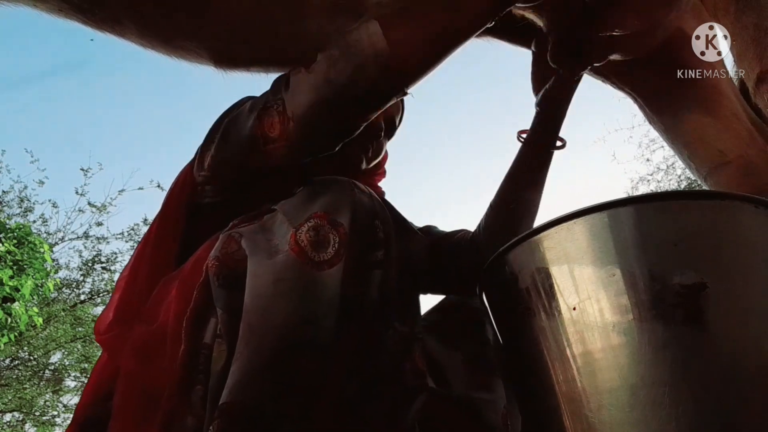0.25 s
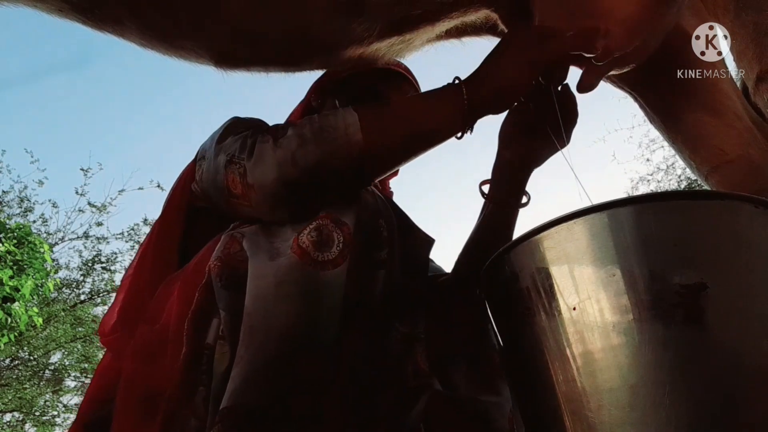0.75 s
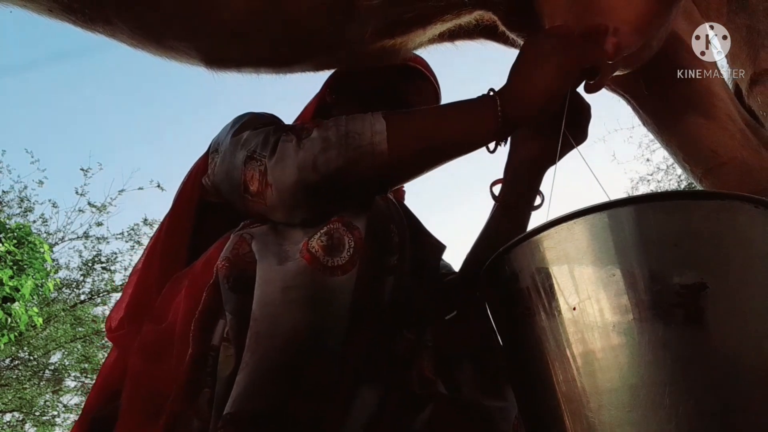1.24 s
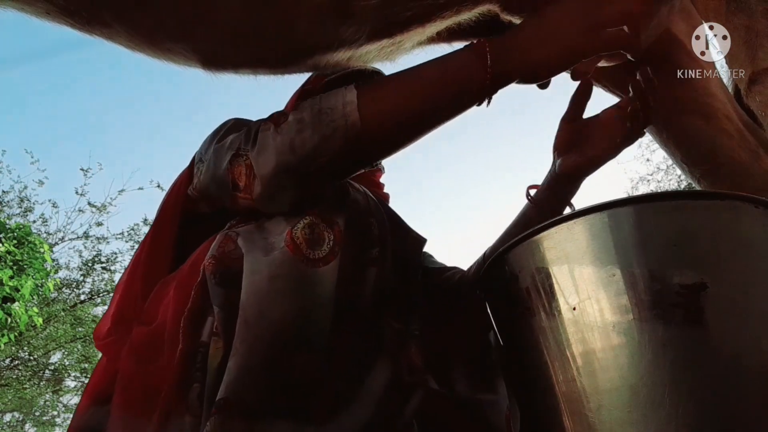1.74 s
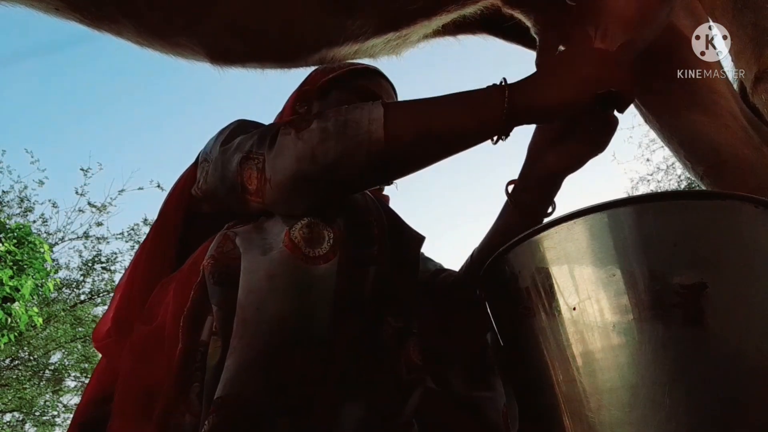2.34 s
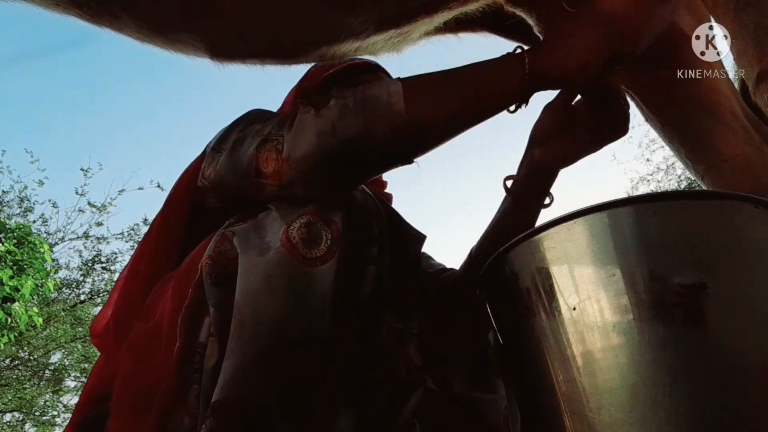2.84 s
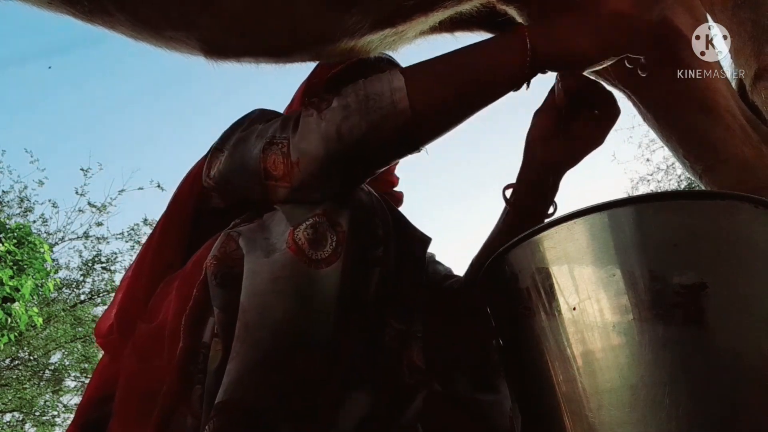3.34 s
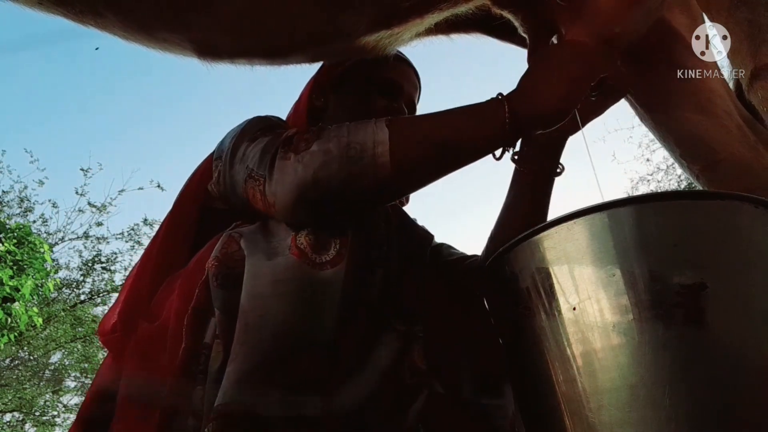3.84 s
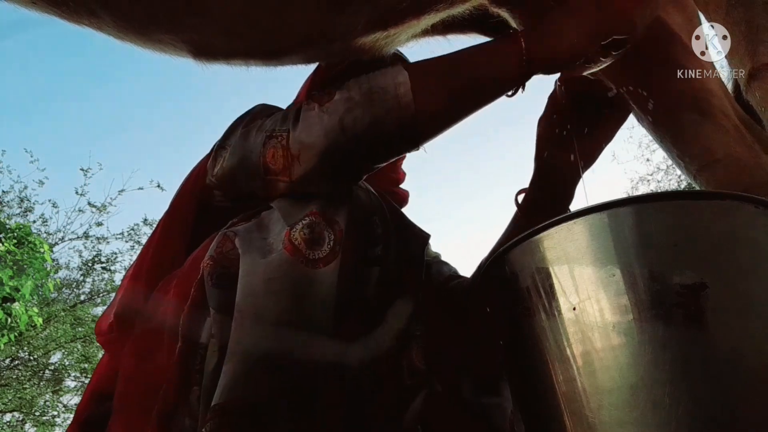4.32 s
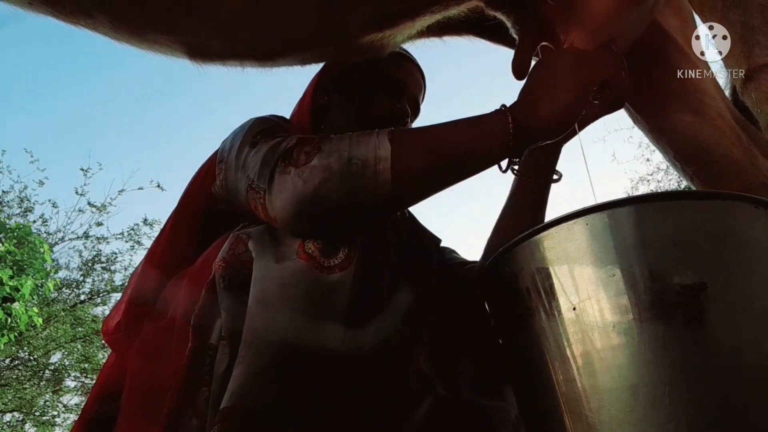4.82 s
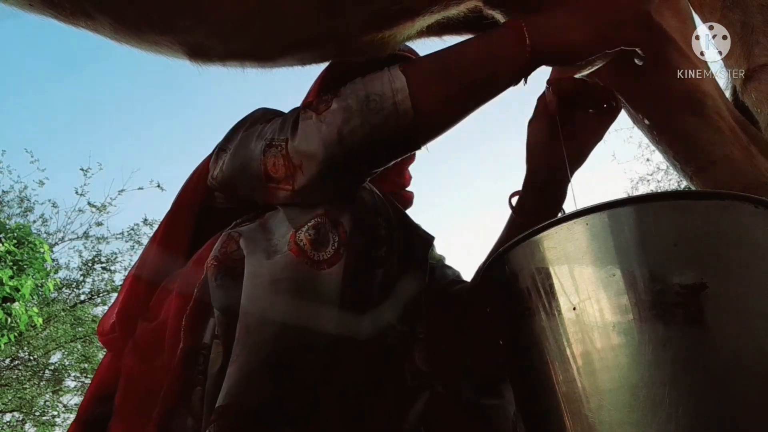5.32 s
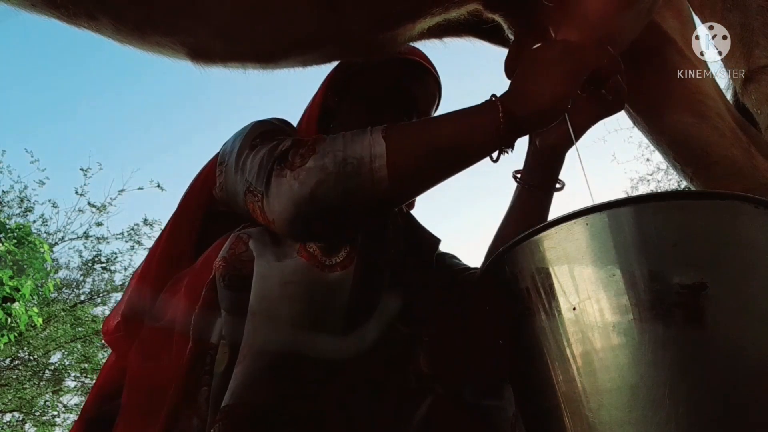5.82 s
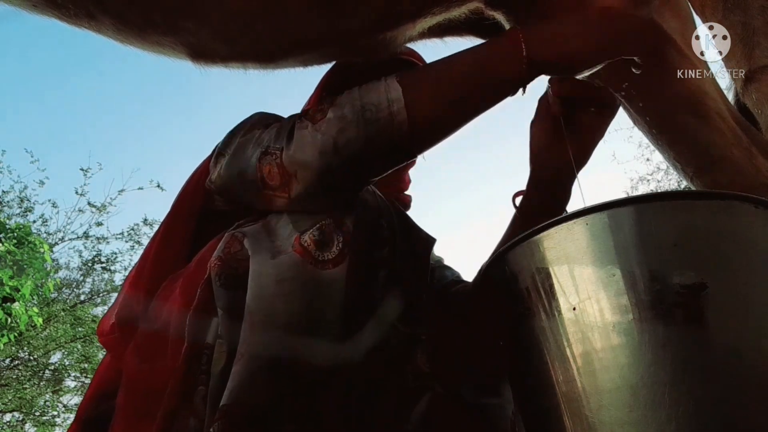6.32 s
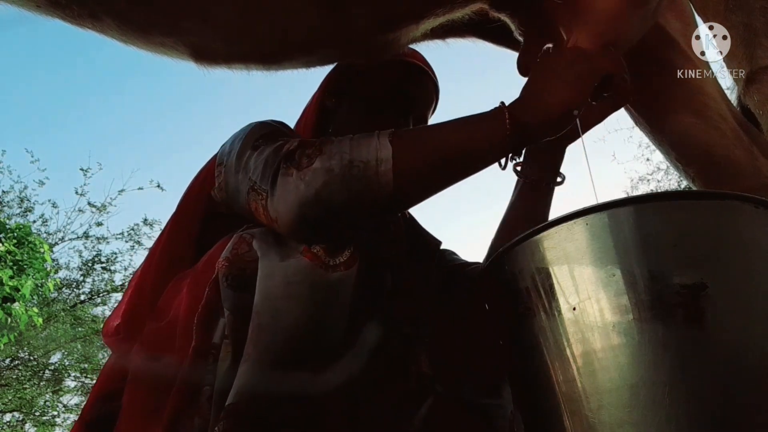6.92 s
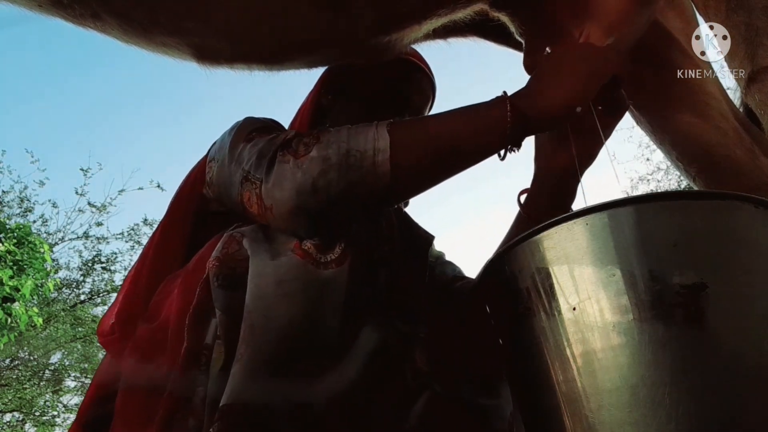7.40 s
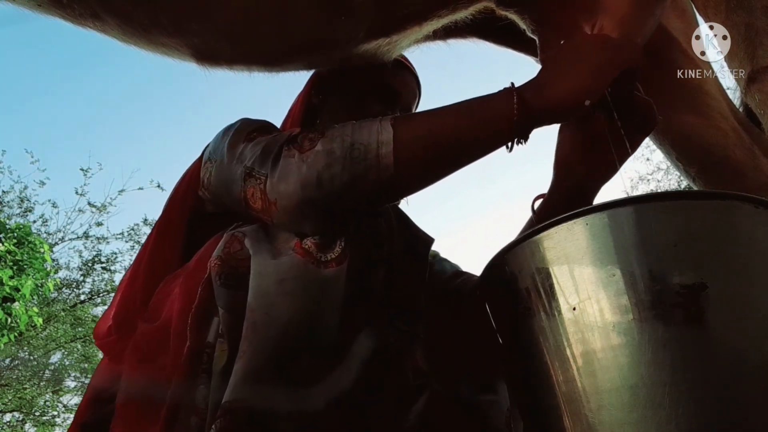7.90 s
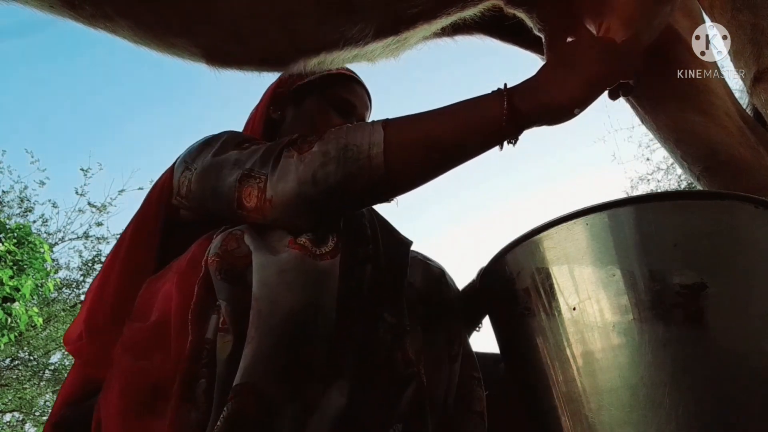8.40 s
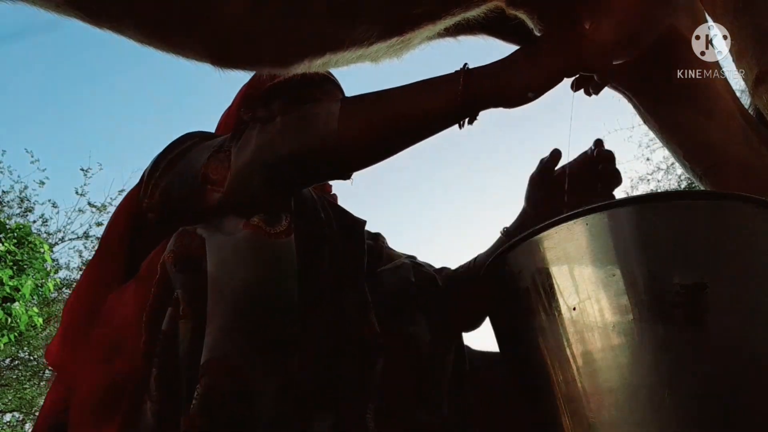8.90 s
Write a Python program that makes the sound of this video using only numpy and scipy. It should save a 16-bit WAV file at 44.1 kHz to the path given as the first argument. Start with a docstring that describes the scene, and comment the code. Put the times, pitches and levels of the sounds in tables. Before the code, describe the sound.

Hand-milking outdoors: soft, thin jets hiss first, then strong rhythmic squirts gulp and gurgle in a steel pail, ending with bangle clinks and bird chirps.

```python
"""Jets of milk fall into a steel pail outdoors as a cow is milked by hand, close to the microphone.
Thin jets are shaped noise that hisses in the froth. Other squirts, weak or strong, also set off random
knocks that ring the air in the pail, patter as droplets and slosh; sine bubbles gulp and plop.
Birds call with gliding sines, soft bumps and brushing are short noises, and bangles clink as
ringing sines when the hands let go. A far tone and quiet, windy air lie behind.
"""
import sys
import numpy as np
from scipy import signal
from scipy.fft import rfft, irfft
from scipy.io import wavfile
from scipy.ndimage import uniform_filter1d

SR = 44100
rng = np.random.default_rng(int(sys.argv[2]) if len(sys.argv) > 2 else 0)


def dump(signal):
    """Clip the signal to [-1, 1] and save it as 16-bit WAV at the path in sys.argv[1]."""
    limited = np.clip(np.atleast_2d(signal).T, -1, 1)
    pcm = np.round(limited * 32767).astype(np.int16)
    wavfile.write(sys.argv[1], SR, pcm)


N = 403515
TIME = np.arange(N) / SR  # seconds

# Notes of the air in the part-filled pail: pitch_hz, width_hz, level_db
PAIL_MODES = [(342.4, 21.2, 6), (467.6, 24, -5), (538.3, 14.6, -1), (603.5, 20, -4.5), (843, 21, -16.5),
              (1074, 26, -11.5)]
# Tone colours of droplets, froth, splats and outdoor air: frequency_hz, level_db
SPATTER_TONE = [(150, -41.5), (300, 3.5), (600, 2), (790, -10), (860, -3), (940, -6.5), (1070, 5),
                (1230, -4), (1480, -2.5), (1660, -3), (1820, -13), (1960, -5.5), (2200, -12.5), (2420, -9),
                (2700, -17), (3600, -13.5), (5000, -19.5), (9000, -23), (15500, -30)]
FROTH_TONE = [(300, -17), (1200, -5.5), (2000, -3.5), (3300, 0.5), (5200, -2), (8400, -1), (10300, 2.5),
              (11500, -1.5), (14000, 1), (15500, -6.5)]
SPLAT_TONE = [(100, -6.5), (330, 2), (600, 10), (1100, 6), (1700, 0), (2400, -3), (4000, -1), (7000, -5),
              (11000, 1.5), (15500, -10)]
AIR_TONE = [(25, -3), (60, -7), (150, 5.5), (400, -2.5), (700, -5.5), (1500, -27), (3300, -14),
            (5500, -12.5), (8000, -21), (14000, -17)]
# Thin jets that hiss in the froth, about two pulls a second: start_s, hold_s, hiss_db
THIN_JETS = [(0.0, 0.045, -52), (.783, 0.038, -54.5), (1.252, 0.066, -52), (1.797, .12, -60),
             (2.389, 0.083, -57.5), (2.957, 0.06, -58), (3.464, 0.053, -57.5), (4.008, 0.021, -55),
             (8.003, 0.037, -59.5), (9.145, .05, -63)]
# Weak and strong squirts and low wobbles of the milk:
# start_s, hold_s, hiss_db, spatter_db, churn_db, slosh_db
SQUIRTS_AND_WOBBLES = [(.02, 0.0079, -67, -54.5, -62, -68), (.765, 0.032, -68, -77, -61, -64),
                       (.877, 0.12, -59, -49.5, -46.5, -54.5), (1.032, 0.2, -58, -52, -42.5, -47.5),
                       (1.272, .13, -66, -62, -44, -65), (1.48, 0.075, -69.5, -64, -47, -66),
                       (2.225, 0.33, -74, -82, -69, -74), (3.17, 0.1, -73, -61, -53, -69),
                       (3.715, 0.065, -65.5, -60, -60.5, -75), (3.941, 0.0075, -67, -60, -54, -65),
                       (4.225, 0.043, -58, -50.5, -68, -60), (4.335, 0.26, -51.5, -51, -40, -46),
                       (4.676, 0.12, -55, -54, -45.5, -55), (4.92, 0.23, -53, -60, -39.5, -45),
                       (5.217, 0.21, -49, -48, -40, -48), (5.497, 0.2, -48.5, -56.5, -39, -46),
                       (5.798, 0.35, -49.5, -54.5, -40, -53.5), (6.213, 0.2, -49, -50.5, -38.5, -44),
                       (6.541, 0.29, -52.5, -52, -40.5, -50), (6.9, 0.11, -61, -78, -53, -65),
                       (7.06, 0.13, -57, -56, -44.5, -65.5), (7.32, 0.13, -49.5, -46.5, -42, -53),
                       (7.496, 0.21, -45.5, -48, -39, -43.5), (7.748, 0.17, -51.5, -63, -38.5, -46),
                       (9.09, 0.017, -89, -72.5, -63, -62)]
# Showers of droplets thrown up by a squirt: start_s, hold_s, spatter_db
DROPLET_SHOWERS = [(4.314, 0.038, -43), (4.895, 0.027, -42.5), (4.96, 0.041, -45.5), (5.389, 0.034, -46),
                   (5.551, 0.025, -49.5), (5.711, 0.036, -37.5), (5.936, 0.065, -47.5), (6.238, 0.008, -44),
                   (6.4, 0.031, -38.5), (6.512, 0.039, -39), (6.76, 0.015, -42)]
# Biggest air pockets that collapse and boom in the pail: crest_s, peak_db
BIG_GULPS = [(1.04, -29), (1.071, -30.5), (1.117, -27.5), (1.18, -29.5), (1.244, -30.5), (4.358, -29),
             (4.448, -29.5), (4.497, -29.5), (4.52, -28), (4.548, -28.5), (4.584, -32), (4.923, -31),
             (5.12, -30.5), (5.235, -31), (5.352, -29), (5.482, -27.5), (5.513, -30), (5.626, -24.5),
             (5.848, -25.5), (5.947, -30), (5.981, -23.5), (6.051, -29.5), (6.078, -31.5), (6.196, -31),
             (6.387, -26.5), (6.437, -24.5), (6.686, -28), (7.453, -32), (7.58, -30.5), (7.715, -29.5),
             (7.796, -30.5)]
# Bird whistles: start_s, length_s, pitch_hz at five even steps through the note, level_db
BIRD_WHISTLES = [(.319, 0.15, 4900, 5080, 5200, 4940, 4850, -75),
                 (.55, .11, 3890, 3990, 4150, 4370, 4470, -70.5),
                 (1.041, 0.074, 6650, 6660, 6710, 6600, 6280, -51),
                 (1.197, 0.072, 6470, 6620, 6600, 6500, 6500, -50),
                 (1.675, 0.1, 3480, 3510, 3210, 2970, 2780, -56.5),
                 (1.785, .04, 3100, 3080, 2990, 2860, 2780, -59),
                 (2.157, 0.11, 3610, 3530, 3380, 3100, 2890, -48.5),
                 (2.531, 0.091, 2940, 3230, 3410, 2400, 2200, -53),
                 (2.75, .13, 3280, 2790, 2540, 3000, 3000, -62.5),
                 (6.509, .059, 3400, 3330, 3250, 3120, 2980, -46),
                 (6.975, 0.12, 3550, 3540, 3330, 3074, 2770, -47),
                 (7.265, 0.069, 4220, 4060, 3890, 3800, 3740, -53),
                 (7.345, 0.066, 2960, 3170, 3280, 3280, 3200, -46),
                 (7.544, .11, 3300, 2835, 2580, 2900, 3100, -46.5),
                 (7.709, 0.11, 3780, 3990, 3980, 3790, 3760, -45),
                 (7.878, .085, 3050, 3450, 3580, 3630, 3520, -47),
                 (7.992, 0.021, 4680, 4600, 4320, 3910, 3540, -48.5),
                 (8.385, 0.11, 7900, 7800, 7780, 7900, 7750, -64),
                 (8.858, 0.054, 7680, 7600, 7570, 7600, 7500, -63)]
# Rasping bird calls: start_s, length_s, start_pitch_hz, end_pitch_hz, level_db
BIRD_RASPS = [(1.594, 0.094, 2485, 2540, -56.5), (2.108, 0.14, 5080, 6000, -70.5),
              (2.525, 0.089, 4580, 5180, -69), (8.134, .16, 4600, 3980, -52.5)]
# Soft bumps against the pail: start_s, pitch_hz, peak_db
PAIL_BUMPS = [(.378, 137, -50.5), (0.818, 131, -46), (1.217, 125, -44.5), (1.409, 135, -44),
              (1.848, 97, -55), (2.181, 151, -58.5), (5.323, 155, -36), (9.069, 170, -52)]
# Slugs of milk that slap the surface or the wall; the first row is a dull knock:
# start_s, level_db, extra_treble_db (above 5 kHz)
SLAPS_AND_KNOCK = [(.406, -61, -25), (1.411, -38.5, 3), (3.686, -52.5, 6.5), (3.929, -29.5, -16),
                   (4.144, -55, 12), (4.262, -28.5, -13), (4.318, -26.5, 0), (4.683, -29, -6),
                   (4.915, -27.5, -6), (5.317, -24.5, -17), (5.361, -35, -2), (5.441, -31, -10),
                   (5.717, -30, -25), (5.733, -26, -25), (5.939, -28, -21), (5.978, -26.5, -4),
                   (6.238, -29.5, -23), (6.316, -29, 1), (6.4, -27, -3), (6.493, -35.5, 7),
                   (6.511, -30, -2), (6.54, -23.5, -11), (6.766, -27, -24), (7.041, -37.5, 5.5),
                   (7.231, -44, 7), (7.263, -26, -20), (7.606, -39, 10), (7.673, -37.5, 10),
                   (7.758, -37.5, 9.5), (7.818, -45, 15)]
# Bursts of middling bubbles above the pail's main note: crest_s, pitch_hz, middle_bubble_db
BUBBLE_BURSTS = [(.9, 530, -34), (1.143, 580, -42), (1.385, 560, -37), (2.835, 400, -56.5),
                 (3.19, 546, -46), (3.268, 500, -47), (3.738, 647, -49), (4.98, 547, -32.5),
                 (5.113, 585, -30), (5.24, 547, -32.5), (5.315, 626, -34), (5.443, 527, -31),
                 (5.582, 528, -31), (5.777, 573, -31.5), (5.865, 610, -35), (5.945, 560, -33),
                 (6.24, 520, -28), (6.275, 514, -28.5), (7.146, 586, -28.5), (7.33, 507, -28)]
# A faint far-off tone: start_s, length_s, pitch_hz, level_db
FAINT_TONE = (1.9, .58, 685, -72)
# Brushes of sleeves and hands: start_s, hold_s, level_db
HAND_BRUSHES = [(8.18, 0.35, -69.5), (8.36, 0.074, -64.5), (8.52, 0.04, -63), (8.805, 0.019, -60.5)]
# Bangle knocks: start_s, level_db, ring_share (0 to 1), left_minus_right_db
BANGLE_KNOCKS = [(8.343, -44, .15, 0), (8.35, -39, 0.8, -4), (8.36, -28, 1, -3), (8.451, -46.5, 0.55, -6),
                 (8.502, -25, 0.3, -2), (8.508, -32, 0.3, 0), (8.754, -44, 0.18, 3), (8.807, -44, 0.16, 9)]
# Bangle notes: pitch_hz, level_db, time_to_fall_60_db_s; the last two hold for a ring share of 1
BANGLE_MODES = [(2600, -30, .12), (3870, -25, .13), (4850, -23, .1), (5440, -16, .085), (9232, -8, .1),
                (10100, -7, .05), (10350, 0, .07), (10640, -2, .07), (14620, -4, .06), (14900, -8, .05)]

# How fast each kind of stroke swells and dies, in dB per second
JET_RISE_DB_S, JET_FALL_DB_S = 180, 181
SQUIRT_RISE_DB_S, SQUIRT_FALL_DB_S = 163, 127.5
SPLASH_RISE_DB_S, SPLASH_FALL_DB_S = 900, 493
BRUSH_RISE_DB_S, BRUSH_FALL_DB_S = 213, 116
JET_SPATTER_DB, JET_CHURN_DB = -15.5, -10  # a thin jet's droplets and stirring, against its hiss
SPLASH_HISS_DB = -10.5  # froth torn up by a splash, against its droplets
FOAM_DB, FOAM_FALL_DB_S = -24, 24  # foam fizzing on after each thin jet, against the jet's hiss
# Small bubbles trapped by droplets: level against the patter, lowest pitch, range of strength
PIP_DB, PIP_HZ, PIP_SPREAD_DB = -8, 600, 15
# Gulp pitch; small gulps: how many a second, peak against the churning, spread of sizes
GULP_HZ, GULPS_PER_S, SMALL_GULP_DB, GULP_SPREAD_DB = 336.8, 11, -7, 2.5
PORT_LAG_S, POCKET_LAG_S = .00016, 0.00025  # the left port hears the pail late, its deep notes latest
BIRD_ECHO_S, BIRD_ECHO_DB = 0.047, -15  # one wall throws the calls back
AIR_DB, WIND_DB = -69, -76.0  # before their slow swells
TOP_HZ = 15700


def undb(db):
    """Turn decibels into a gain."""
    return 10 ** (np.asarray(db) / 20)


def together(*levels_db):
    """Give the level of unrelated sounds heard at once: their powers add."""
    return 10 * np.log10(sum(undb(db) ** 2 for db in levels_db))


def colour(x, points):
    """Filter with a drawn (Hz, dB) outline, built from its cepstrum so that nothing sounds early."""
    size = 2048
    hz, db = np.transpose(points)
    log_hz = np.log(np.fft.rfftfreq(size, 1 / SR) + 1)
    log_gain = np.log(undb(np.interp(log_hz, np.log(hz), db)))
    # keeping only the forward half makes the filter causal
    forward = np.r_[1, np.full(size // 2 - 1, 2), np.zeros(size // 2)]
    cepstrum = irfft(log_gain) * forward
    response = irfft(np.exp(rfft(cepstrum)))
    return signal.oaconvolve(x, response[None], axes=1)[:, :N]


def band(x, lo_hz, hi_hz, order=2):
    """Keep the frequencies between two limits."""
    limits = [lo_hz, min(hi_hz, .45 * SR)]
    return signal.sosfilt(signal.butter(order, limits, "band", fs=SR, output="sos"), x)


def unit(x, lo_hz, hi_hz):
    """Scale a stereo sound so that its centre has rms 1 in a band."""
    return x / band(x.mean(0), lo_hz, hi_hz, order=4).std()


def walk(rate):
    """Wander through random levels, each held 1 / rate seconds and smoothed twice; spread near 1."""
    k = int(SR / rate)
    steps = np.repeat(rng.standard_normal(N // k + 1), k)
    return 1.62 * uniform_filter1d(uniform_filter1d(steps, k), k)[:N]


def drops(rate, spread_db):
    """Scatter single-sample impacts of unequal size, about `rate` a second."""
    size = undb(spread_db * np.minimum(rng.exponential(size=N), 5))
    hits = rng.random(N) < rate / SR
    return hits * size * rng.choice([-1, 1], N)


def ports(centre, side, split_hz, pan_db):
    """Make two microphone ports: long waves reach both alike, short ones differ, the left one late."""
    side = signal.sosfilt(signal.butter(1, split_hz, "high", fs=SR, output="sos"), side)
    left = np.roll(centre + side, int(PORT_LAG_S * SR))
    return np.array([left, centre - side]) * undb(np.array([[pan_db], [-pan_db]]) / 2)


def add(out, s, sound):
    """Mix a short sound in at time s."""
    i = max(int(s * SR), 0)
    out[:, i:i + sound.shape[-1]] += sound[..., :max(N - i, 0)]


def echoes(x, t60, wet_db):
    """Add dense reflections that fall 60 dB in t60 seconds, different at each port."""
    t = TIME[:SR // 2]
    tail = rng.standard_normal((2, len(t))) * undb(-60 * t / t60)
    tail /= np.sqrt((tail ** 2).sum(1, keepdims=True))
    return x + undb(wet_db) * signal.oaconvolve(x, tail, axes=1)[:, :N]


def strokes(table, rise_db_s, fall_db_s):
    """Let rows of (start_s, hold_s, levels) swell, hold and die; one running level per dB column."""
    rows, t = np.array(table), TIME[::64]
    start, hold = rows[:, :1], rows[:, 1:2]
    before = np.maximum(start - t, 0)
    after = np.maximum(t - start - hold, 0)
    shape = undb(-rise_db_s * before - fall_db_s * after)
    power = undb(rows[:, 2:].T) ** 2 @ shape ** 2
    return [np.interp(TIME, t, 10 * np.log10(p + 1e-18)) for p in power]


def open_air():
    """Shape noise into quiet outdoor air with a low, restless murmur of wind."""
    air = colour(ports(*rng.standard_normal((2, N)), split_hz=480, pan_db=-2.5), AIR_TONE)
    wind = band(ports(*rng.standard_normal((2, N)), split_hz=100, pan_db=-6.0), 53, 160)
    swell, gusts = undb(1.2 * walk(3)), undb(3 * walk(12))
    return air / air.std() * swell * undb(AIR_DB) + wind / wind.std() * gusts * undb(WIND_DB)


def milking():
    """Each table row swells, holds and slackens; its envelope drives froth, droplets, churn and slosh."""
    jet_db, = strokes(THIN_JETS, JET_RISE_DB_S, JET_FALL_DB_S)
    linger_db, = strokes(THIN_JETS, JET_RISE_DB_S, FOAM_FALL_DB_S)
    splash_db, = strokes(DROPLET_SHOWERS, SPLASH_RISE_DB_S, SPLASH_FALL_DB_S)
    squirts = strokes(SQUIRTS_AND_WOBBLES, SQUIRT_RISE_DB_S, SQUIRT_FALL_DB_S)
    hiss_db, spatter_db, churn_db, slosh_db = squirts
    left, right = gulps(churn_db) + plops()
    pockets = np.array([np.roll(left, int(POCKET_LAG_S * SR)), right])
    body = churn(together(churn_db, jet_db + JET_CHURN_DB)) + slosh(slosh_db) + pockets
    droplets = spatter(together(spatter_db, splash_db, jet_db + JET_SPATTER_DB))
    fizz_db = together(hiss_db, jet_db, linger_db + FOAM_DB, splash_db + SPLASH_HISS_DB)
    foam = froth(fizz_db, churn_db)
    return body + echoes(droplets + foam + splats(), t60=0.16, wet_db=-9)


def froth(level_db, plunge_db):
    """A thin jet fizzes evenly in the foam; a plunging one sputters and pops its bubbles."""
    force = np.clip((plunge_db + 49.0) / 18, 0, 1)
    sputter = undb(force * 2.1 * walk(85))
    # now and then a bigger bubble snaps, fading over 3 ms
    snaps = np.abs(drops(rate=26, spread_db=2))
    bursts = signal.lfilter([1], [1, -np.exp(-1 / (.003 * SR))], snaps)
    sputter = sputter * (1 + force * np.minimum(bursts, 2))
    fizz = rng.standard_normal((2, N))
    pops = np.array([drops(rate=520, spread_db=5.0) for _ in range(2)])
    mix = sputter * (fizz * (1 - 0.65 * force) + (0.2 + 0.17 * force) * pops / pops.std())
    # bubbles of each size burst in their own clusters
    edges = np.geomspace(1100, 16000, 9)
    foam = np.zeros((2, N))
    for k, (lo, hi) in enumerate(zip(edges, edges[1:])):
        clusters = undb((2.0 + 0.89 * force) * walk(70))
        foam += band(mix, lo, hi) * clusters * (-1) ** k
    foam = colour(ports(*foam, split_hz=360, pan_db=0.1), FROTH_TONE)
    return unit(foam, 6700, 18700) * undb(level_db)


def bubbles(count, life_s, rise):
    """Small bubbles of unequal strength pip briefly, rising in pitch, in different phase at each port."""
    out = np.zeros((2, N))
    age = TIME[:SR // 40] / life_s
    for when, size, strength, turn in rng.random((count, 4)):
        hz = PIP_HZ * 8 ** size
        port_phase = np.pi * (turn - .5) * np.array([[1], [-1]])
        phase = 2 * np.pi * hz * life_s * age * (1 + rise * age) + port_phase
        gain = undb(PIP_SPREAD_DB * strength ** 3 + 7 * size)
        add(out, when * N / SR, gain * np.sin(phase) * np.sqrt(age) * np.exp(-age))
    return out / out.mean(0).std()


def spatter(level_db):
    """Droplets thrown up by the jet patter back in flurries and trap small bubbles."""
    flurry = undb(3.1 * np.minimum(walk(75), 1.4))
    centre, side = (drops(rate=1000, spread_db=3.0) for _ in range(2))
    pips = undb(PIP_DB) * bubbles(count=3200, life_s=.0022, rise=0.011)
    hits = ports(centre / centre.std(), 0.78 * side / side.std(), split_hz=1330, pan_db=-6.5)
    patter = colour(flurry * (hits + pips), SPATTER_TONE)
    wet = unit(echoes(band(patter, 190, 14000), t60=0.036, wet_db=0.0), 530, 2900)
    # slow droplets land softly and sound dull
    speed = np.clip((level_db + 65) / 10, 0, 1)
    dull = band(wet, 280, 1350, order=2)
    return (np.sqrt(speed) * wet + np.sqrt(1 - speed) * dull) * undb(level_db)


def pail(x):
    """The air in the pail rings at its own notes, each a narrow resonance."""
    return sum(undb(db) * signal.lfilter(*signal.iirpeak(hz, hz / width, fs=SR), x)
               for hz, width, db in PAIL_MODES)


def churn(level_db):
    """Air dragged under by the jet keeps the pail ringing; a weak jet stays on top and splutters."""
    surge = undb(2.0 * walk(45))
    centre, side = (surge * drops(rate=1400, spread_db=1.5) for _ in range(2))
    bursts = ports(centre, side, split_hz=4100, pan_db=-0.5)
    depth = np.clip((level_db + 61.0) / 16, .1, 1)
    deep = unit(pail(band(bursts, 88, 2700, order=1)), 342.0, 950)
    shallow = unit(pail(band(bursts, 405, 710)) + 0.16 * band(bursts, 210, 750), 280, 840)
    return (np.sqrt(depth) * deep + 0.19 * np.sqrt(1 - depth) * shallow) * undb(level_db)


def slosh(level_db):
    """Large bubbles wobble below the pail's main note, and the moving milk rumbles faintly."""
    centre, side = (drops(rate=500, spread_db=0.0) * undb(4.2 * np.minimum(walk(35), 1))
                    for _ in range(2))
    motion = ports(centre, side, split_hz=2300, pan_db=-5.5)
    wobble = band(motion, 222, 301)
    rumble = undb(-16.5) * band(motion, 93, 180)
    return unit(wobble + rumble, 180, 306) * undb(level_db)


def gulps(churn_db):
    """Large bubbles swell and die near the pail's strongest note; small ones follow the churning."""
    out, t = np.zeros((2, N)), TIME[:SR // 6]
    crest_s = 0.01421
    swell = (t / crest_s * np.exp(1 - t / crest_s)) ** 1.7
    chance = rng.standard_normal((200, 3))  # timing, size, tuning
    times = (np.arange(len(chance)) + .25 * chance[:, 0]) / GULPS_PER_S
    sizes = np.interp(times, TIME, churn_db) + SMALL_GULP_DB + GULP_SPREAD_DB * chance[:, 1]
    # small gulps keep clear of the big ones
    small = [(s, db) for s, db in zip(times, sizes)
             if s < TIME[-1] and min(abs(s - big) for big, _ in BIG_GULPS) > 2 * crest_s]
    for (s, db), detune in zip(BIG_GULPS + small, chance[:, 2]):
        hz = GULP_HZ * (1 + 0.018 * detune)
        add(out, s - crest_s, undb(db) * swell * np.sin(2 * np.pi * hz * t))
    return out


def birds():
    """Quavering whistles, faint ones blurred most, and buzzing rasps echo off a wall and trees."""
    out = np.zeros((2, N))
    quaver, flutter = walk(260), undb(2.2 * walk(110))
    for s, length, *pitches, db in BIRD_WHISTLES:
        u = np.linspace(0, 1, int(length * SR))  # progress through the note
        now = slice(int(s * SR), int(s * SR) + len(u))
        blur = np.interp(db, [-70, -55], [.025, .008])
        glide = np.interp(u, np.linspace(0, 1, len(pitches)), pitches)
        hz = uniform_filter1d(glide, size=len(u) // 6) * (1 + blur * quaver[now])
        swell = flutter[now] * np.abs(np.sin(np.pi * u)) ** 0.52
        add(out, s, undb(db) * swell * np.sin(2 * np.pi * np.cumsum(hz) / SR))
    for s, length, start_hz, end_hz, db in BIRD_RASPS:
        u = np.linspace(0, 1, int(length * SR))
        buzz = np.sin(2 * np.pi * 150 * length * u)  # 150 Hz
        glide = start_hz + (end_hz - start_hz) * u
        hz = glide * (1 + .045 * buzz + .035 * walk(900)[:len(u)])
        swell = np.abs(np.sin(np.pi * u)) ** 0.37 * (1 + .5 * buzz)
        add(out, s, undb(db) * swell * np.sin(2 * np.pi * np.cumsum(hz) / SR))
    # small throats radiate their lowest notes weakly
    out = band(out, 2500, 12000, order=3)
    out = out + undb(BIRD_ECHO_DB) * np.roll(out, int(BIRD_ECHO_S * SR), axis=1)
    return echoes(out, t60=.42, wet_db=0)


def bumps():
    """Soft thuds: low noise that dies away fast, as if heavily damped."""
    out, t = np.zeros((2, N)), TIME[:SR // 5]
    for s, hz, db in PAIL_BUMPS:
        noise = band(rng.standard_normal(len(t)), 0.77 * hz, 1.54 * hz)
        thud = noise * t * np.exp(-t / 0.018)
        add(out, s, undb(db) * thud / np.abs(thud).max())
    return out


def splats():
    """A noise burst dies in milliseconds as a slug breaks up, or as a dull knock; fine drops follow."""
    out, t = np.zeros((2, N)), TIME[:SR // 10]
    slap = (1 - np.exp(-t / 0.00092)) * np.exp(-t / 0.0042)
    fall = np.exp(-t / 0.011)
    for s, db, treble_db in SLAPS_AND_KNOCK:
        burst = rng.standard_normal((2, len(t))) * slap
        # a slap on bare steel is brighter
        bright = band(burst, 5400, 15800, order=1)
        # cubed noise is mostly quiet with rare strong peaks, like separate drops
        droplets = band(rng.standard_normal((2, len(t))) ** 3 * fall, 790, 1940)
        add(out, s, undb(db) * (burst + (undb(treble_db) - 1) * bright + 0.13 * droplets))
    return colour(ports(*out, split_hz=3400, pan_db=-0.5), SPLAT_TONE)


def plops():
    """Three bubbles of about one size, trapped in quick succession, ring briefly and rise a little."""
    out, t = np.zeros((2, N)), TIME[:SR // 12]
    life_s, scatter_s = .0045, .005
    ring = t / life_s * np.exp(1 - t / life_s)
    for s, hz, db in BUBBLE_BURSTS:
        for order, (delay, detune) in zip([-1, 0, 1], rng.standard_normal((3, 2))):
            pitch = hz * (1 + 0.12 * detune) * (1 + 1.3 * t)
            tone = np.sin(2 * np.pi * np.cumsum(pitch) / SR)
            bubble = undb(db - 3.8 * abs(order)) * ring ** 2 * tone
            add(out, s - life_s + scatter_s * (2 * order + delay / 2), bubble)
    return out


def far_tone():
    """A thin sine with a wavering pitch pulses 24 times a second, far away."""
    s, length, hz, db = FAINT_TONE
    swell = np.sin(np.pi * np.clip((TIME - s) / length, 0, 1))
    pulse = 1 + .5 * np.sin(2 * np.pi * 24 * TIME)
    pitch = hz * (1 + 0.0207 * walk(90))
    return undb(db) * swell * pulse * np.sin(2 * np.pi * np.cumsum(pitch) / SR)


def rubbing():
    """Cloth and skin brush as the hands come away: grainy noise that swells and fades."""
    grain = rng.standard_normal((2, N)) * undb(1.2 * walk(120))
    level_db, = strokes(HAND_BRUSHES, BRUSH_RISE_DB_S, BRUSH_FALL_DB_S)
    return unit(band(grain, 310, 11000, order=1), 5200, 17000) * undb(level_db)


def bangles():
    """Bangles knock with a tick and a short ring; a low ring share is choked and brighter."""
    out, t = np.zeros((2, N)), TIME[:SR // 4]
    for s, db, ring, pan_db in BANGLE_KNOCKS:
        phases = 1.2 * rng.standard_normal((len(BANGLE_MODES), 2, 1))
        modes = np.zeros((2, len(t)))
        for (hz, mode_db, t60), phase in zip(BANGLE_MODES, phases):
            tilt = (hz / 10000) ** (2 * (1 - ring))
            decay = np.exp(-np.log(1000) * t / (t60 * ring))
            modes += undb(mode_db) * tilt * decay * np.sin(2 * np.pi * hz * t + phase)
        tick = band(rng.standard_normal((2, len(t))), 5300, 18000) * np.exp(-t / 0.0024)
        onset = 1 - np.exp(-t / 0.00073)
        gain = undb(db + np.array([[pan_db], [-pan_db]]) / 2)
        add(out, s, gain * (modes + 0.5 * tick) * onset)
    return echoes(out, t60=.25, wet_db=-12)


def scene():
    """Mix the milk in the pail with the small sounds around it."""
    return milking() + bumps() + bangles() + birds() + rubbing() + far_tone() + open_air()


def record(dry):
    """Cut the treble steeply above TOP_HZ."""
    return signal.sosfilt(signal.ellip(10, .2, 70, TOP_HZ, fs=SR, output="sos"), dry)


dry = scene()
out = record(dry)
dump(out)
```